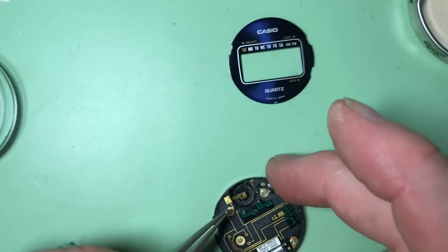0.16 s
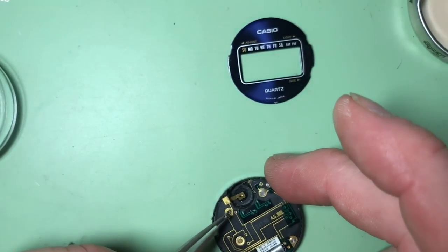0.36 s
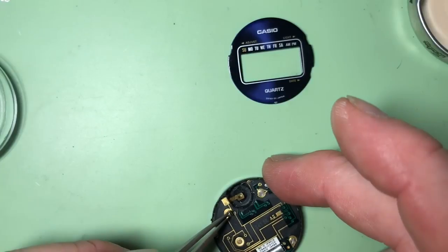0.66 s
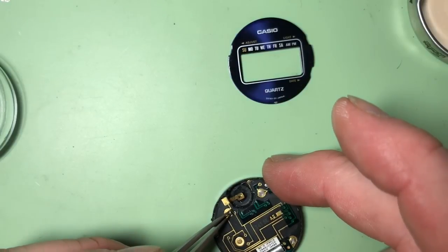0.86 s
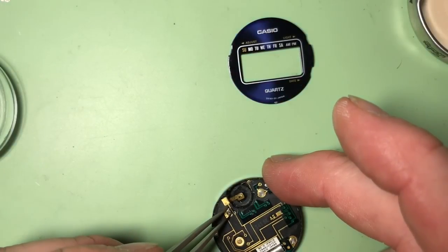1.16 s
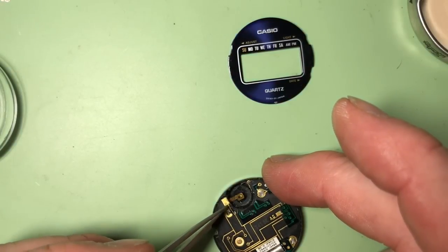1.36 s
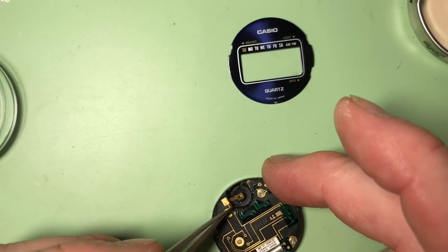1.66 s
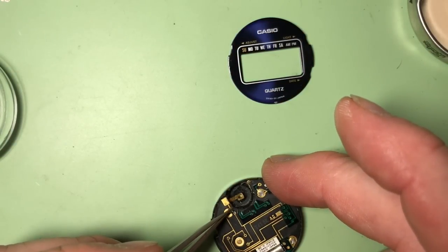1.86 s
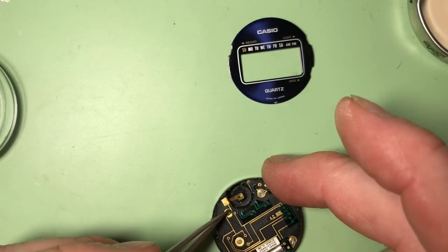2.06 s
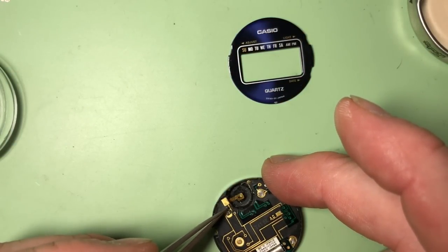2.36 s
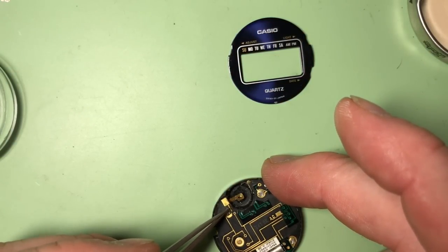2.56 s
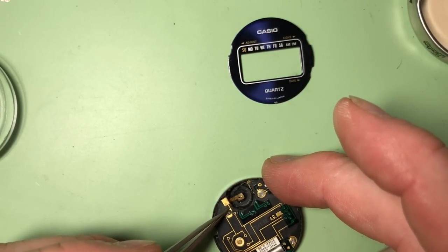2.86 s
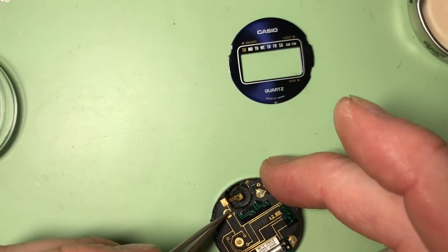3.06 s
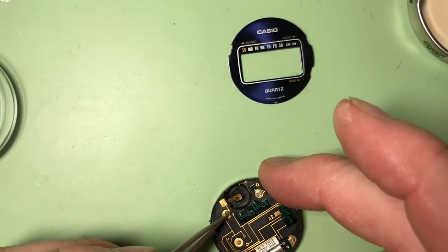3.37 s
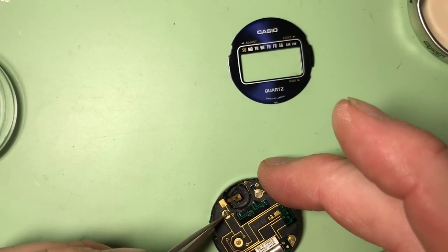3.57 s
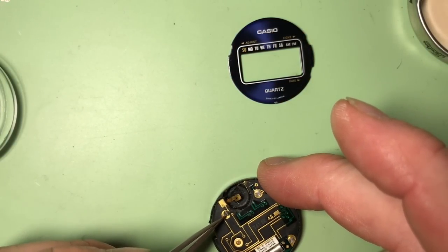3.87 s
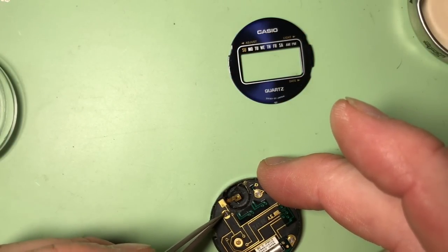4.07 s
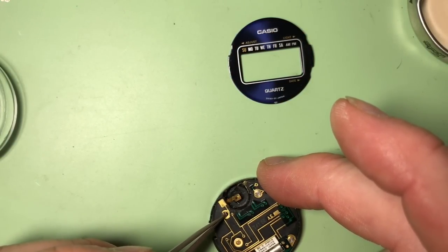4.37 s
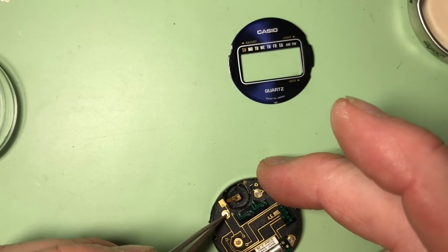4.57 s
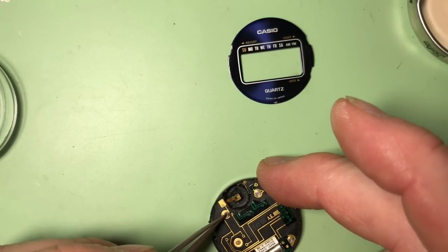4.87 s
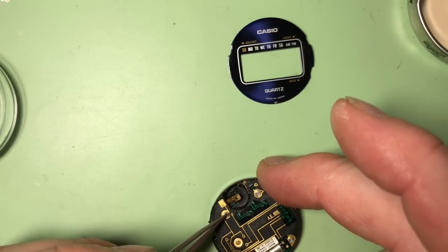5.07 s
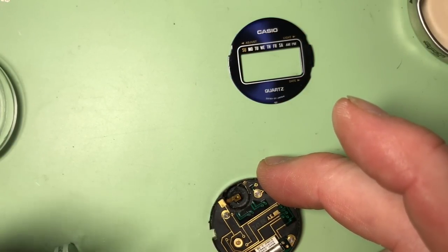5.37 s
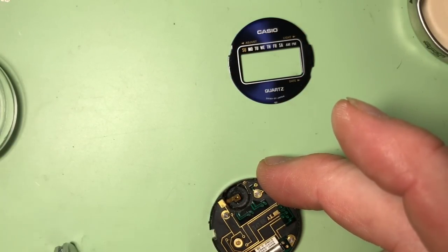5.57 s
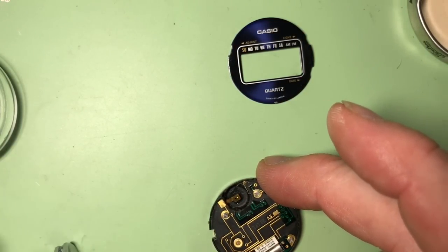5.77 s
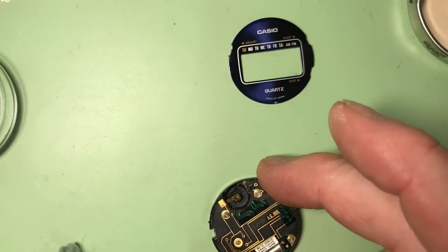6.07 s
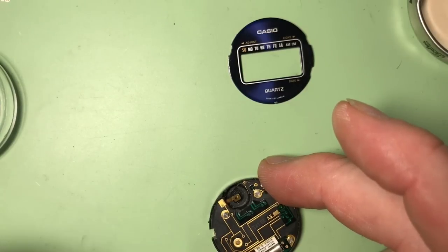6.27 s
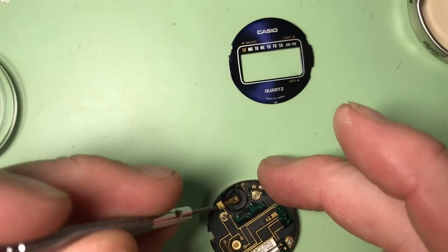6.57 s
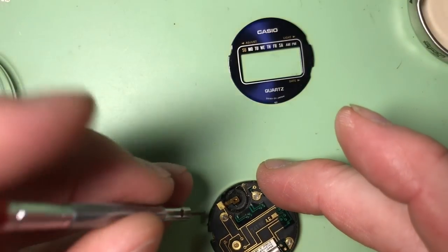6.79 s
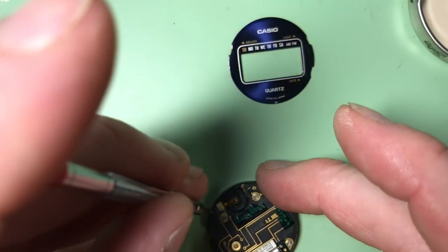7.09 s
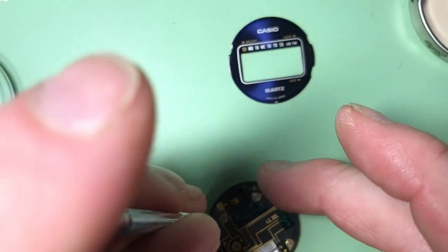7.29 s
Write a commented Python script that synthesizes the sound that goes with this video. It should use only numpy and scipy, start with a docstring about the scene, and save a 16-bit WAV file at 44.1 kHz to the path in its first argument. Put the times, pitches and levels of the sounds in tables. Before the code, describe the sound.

In a quiet small room, close to the microphone, fine steel tweezers make very faint, scattered ticks on a tiny screw and watch board. After two light taps and soft scrapes, the tweezers are dropped: a hard knock on the bench, quick shrinking bounces and a bright, brief ring. Small crisp screwdriver clicks and soft rubbing follow over faint rumble, hiss and mains hum.

```python
"""Steel tweezers tick and scrape at a tiny screw on a watch circuit board, close by in a quiet room.
They are drawn away and dropped: the bench knocks, the blades clap, ring and bounce to rest; then a
small screwdriver clicks as it is picked up. Faint rumble, hiss and mains hum lie beneath.
Contacts are decaying noise plus damped sine modes, strokes are shaped noise, bounces a shrinking series."""
import sys
import numpy as np
from scipy import signal
from scipy.fft import rfft, irfft
from scipy.io import wavfile
from scipy.ndimage import map_coordinates

SR = 44100
rng = np.random.default_rng(int(sys.argv[2]) if len(sys.argv) > 2 else 0)


def transcribe(u):
    """Save the signal u as a 16-bit wav file named by the first command-line argument.

    u: samples, shape (n,) or (channels, n), limited to [-1, 1]; the rate is SR.
    q: integer samples, one column per channel.
    """
    v = np.clip(np.atleast_2d(u).T, -1, 1)
    q = np.round(v * 32767).astype(np.int16)
    wavfile.write(sys.argv[1], SR, q)


N = 327920

# Table levels are relative: trims and spectra in the functions add to them.
# Single blows on the bench: t/s, crack/dB, knock/dB, thud/dB, steel pitch at the contact/Hz
BENCH_BLOWS = [(4.335, -51, -48, -59, 4355), (4.3656, -53.5, -54, -55.5, 4500),
               (4.746, -53.5, -57, -76, 4300), (5.3834, -41, -52, -50.5, 5940),
               (5.434, -44, -52, -46.5, 3200), (5.951, -22.5, -39.5, -31.5, 4960),
               (5.9623, -36, -54, -49.5, 5400), (6.0182, -32, -50.5, -59.5, 5250),
               (6.0254, -21, -23.5, -22.5, 2940), (6.045, -28, -29.5, -36.5, 3000)]
# Dropped tweezers bouncing on heel and each leg: first contact t/s, crack/dB, knock/dB, thud/dB,
# pitch f/Hz, first flight/s, flight ratio to the one before, loss per bounce/dB
BOUNCE_SERIES = [(6.0203, -13.5, -9.8, -22.5, 2850, .0907, .325, 6.7),
                 (6.0822, -23, -30, -39, 5100, .0348, .748, 3.3),
                 (6.099, -24.5, -34, -39, 5300, .0277, .79, 4.5)]
# Bench top flexing as a whole: f/Hz, level/dB, t60/s
THUD_MODES = [(185.4, -4, 0.17), (206, -4.5, 0.063), (235.3, -7.5, 0.12), (268, -1.5, 0.077),
              (323.7, -4.5, 0.065), (368, -5.5, 0.05), (429, -7.5, .04), (558, -19.5, 0.16)]
# Stiffer local knock of the bench top: f/Hz, level/dB, t60/s
KNOCK_MODES = [(746, -18, .07), (945, -13, .05), (1100, -12, .04), (1160, -15, .035), (1333, -13, .04),
               (1462, -2, .034), (1560, -8, .025), (1740, -5, .03), (1860, -6, .03), (2230, -9, .018),
               (2520, -16, .02), (3120, -13, .018)]
# Steel on the bench, spectrum: f/Hz, level/dB
CRACK_SPECTRUM = [(60, -40), (300, -14), (1500, -3), (2300, -3), (3300, -4), (4100, -11), (5300, 0),
                  (7700, -7), (12000, -9), (16000, -16)]
# Tweezer blades clapping together: t/s, strength/dB, brightness/(dB/octave)
BLADE_CLAPS = [(6.0405, -27, 0.5), (6.070, -32, -8.5), (6.075, -31, 2.5), (6.098, -46, 6)]
# Free steel blades: f/Hz, level/dB, t60/s
BLADE_MODES = [(2692, -13, .3), (2826, -8, .27), (3133, -13, .3), (3634, -16, .25), (5319, -5, .22),
               (6008, -10, .22), (8689, -15, .2), (9476, 2, .18), (9513, -9, .22), (11140, -11, .22),
               (11330, -11, .25), (12010, -7, .19), (14020, -11, .14), (14790, -3, .17), (15090, -10, .13)]
# Steel on steel, spectrum: f/Hz, level/dB
CLASH_SPECTRUM = [(200, -50.5), (1500, -16.5), (3000, -12), (6000, -9), (8000, -7.5), (11500, -6.5),
                  (14500, -5.5), (16000, -4)]
# Tweezer tips slipping on screw and board: t/s, level/dB, pitch of the touched part f/Hz
TIP_TICKS = [(0.1145, -37.5, 8660), (0.123, -43, 8560), (0.1378, -42, 6560), (0.896, -47, 5500),
             (0.9348, -53, 4910), (1.0633, -49, 6380), (2.0375, -46.5, 9250), (2.0512, -48.5, 5400),
             (2.8603, -48.5, 5458), (3.0906, -42.5, 9600), (3.1351, -52, 4300), (3.315, -46.5, 5670),
             (3.3472, -49, 5400), (3.3707, -49.5, 4270), (3.5348, -49.5, 5620), (4.3987, -48.5, 5290),
             (4.5027, -50.5, 4340), (5.225, -54, 9300)]
# Tips on tiny parts, spectrum: f/Hz, level/dB
PING_SPECTRUM = [(400, -56), (2500, -13), (3600, -55), (4400, 3.5), (6000, 2), (9500, -3), (12000, -6),
                 (16000, -3)]
# Held tweezers setting a small part down: t/s, strength/dB, brightness/(dB/octave)
PART_TAPS = [(5.5583, -31, 1.5), (5.789, -34, -1.5)]
# Finger-damped steel: f/Hz, level/dB, t60/s
HELD_MODES = [(3410, -4.5, 0.019), (5210, -9, 0.021), (7120, -2, 0.022), (9740, -18, 0.011),
              (12780, -2.5, 0.012), (12850, 1, 0.012)]
# Steel drawn over the bench and through the fingers: t/s, length/s, fine hiss/dB, coarse scrape/dB
STROKE_EVENTS = [(0.101, .06, -74, -63), (0.111, 0.18, -77, -68.5), (5.365, 0.13, -60, -63.5),
                 (5.535, 0.046, -61, -63.5), (5.6, 0.11, -57.5, -88), (5.662, 0.024, -66, -62.5),
                 (5.717, 0.11, -62, -78), (6.165, 0.095, -66, -61), (6.291, 0.35, -65.5, -69.5),
                 (6.721, 0.25, -67.5, -70.5)]
# Polished steel sliding, spectrum: f/Hz, level/dB
FINE_SPECTRUM = [(500, -28), (3000, -2), (6000, -4.5), (7300, -2.5), (8200, -3), (11000, -2), (12800, 2),
                 (13700, 1), (16000, 2.5)]
# Dragging on the bench, spectrum: f/Hz, level/dB
COARSE_SPECTRUM = [(60, -35), (400, -1), (950, 3.5), (1700, -4.5), (2900, 1), (3600, -4), (4400, -3),
                   (6300, -7), (9000, -2), (16000, -35)]
# Screwdriver picked up and turned: t/s, strength/dB, brightness/(dB/octave)
SCREWDRIVER_CLICKS = [(6.1785, -38, 19), (6.2235, -31.5, 11), (6.249, -37.5, 6), (6.3147, -46, -4),
                      (6.394, -43, -6.5), (6.4612, -37, -0.5), (6.5137, -28, 2.5), (6.540, -33.5, 3),
                      (6.6904, -30, 9.5), (6.953, -28.5, -0.5)]
# Screwdriver steel: f/Hz, level/dB, t60/s
SHAFT_MODES = [(2790, -12.5, 0.01), (6330, -3, 0.0092), (10120, -3.5, 0.013675), (14300, -15, 0.013),
               (15600, 2, 0.012)]
# Room decay: f/Hz, t60/s
ROOM_DECAY = [(150, .35), (1000, .25), (5000, .22), (15000, .12)]
# Room rumble, spectrum: f/Hz, level/dB
RUMBLE_SPECTRUM = [(15, -45), (25, -22), (42, -9), (55, -3), (78, -11), (120, -12), (150, -9), (220, -11),
                   (330, -11), (480, -19), (1000, -21), (1250, -24), (1700, -55)]
# Microphone hiss, spectrum: f/Hz, level/dB
HISS_SPECTRUM = [(710, -31), (1200, -24), (1290, -1.5), (1570, -0.5), (1720, -3), (3700, -5), (4910, -8),
                 (5970, -8), (9720, -10.5), (10600, -15), (11800, -6), (15200, -8.5), (16000, -11.5)]

T_S = np.arange(SR // 2) / SR  # time axis of one contact
FIRM_DB = -30  # strength of a firm contact
RING_DB_PER_DB = 2  # ring per dB of strength: light touches mostly clash
KNOCK_LOSS_RATIO = 1.85  # knock loses this many times the dB of crack and thud
SOFT_TILT = 0.22  # light knocks are duller: dB/octave lost per dB below firm
MODE_SPREAD = .025  # largest relative detuning of a knock mode, redrawn each landing
UNEVEN_HZ, UNEVEN_DB = 41.7, 6  # finger pressure: random points per second, spread
SNAG_RATE_HZ, SNAG_DB, SNAG_T60_S = 110, 4.5, 0.0085  # mean rate, level over the rub, decay


def amp(db):
    """Decibels to gain."""
    return 10 ** (np.asarray(db) / 20)


def unit(x):
    """Scale to rms 1."""
    return x / np.sqrt(np.mean(x ** 2) + 1e-20)


def along(points, hz):
    """Interpolate (f/Hz, value) points on a log frequency axis."""
    f, v = np.transpose(points)
    return np.interp(np.log(hz + 1), np.log(f + 1), v)


def add(track, start_s, sound):
    """Mix a sound into the track, cut at its end."""
    part = track[round(start_s * SR):][:len(sound)]
    part += sound[:len(part)]


def noise(spectrum, size, tilt=0):
    """Noise of rms 1 with a spectrum, tilted in dB/octave above 1 kHz."""
    hz = np.fft.rfftfreq(size, 1 / SR)
    octaves = np.log2(np.maximum(hz, 1000) / 1000)
    gain = amp(along(spectrum, hz) + tilt * octaves)
    return unit(irfft(rfft(rng.standard_normal(size)) * gain, size))


def fade(t60_s):
    """Exponential decay, 60 dB down after t60."""
    return np.exp(-np.log(1000) * T_S / max(t60_s, 1e-4))


def ring(modes, attack_s, tilt=0):
    """Damped modes; each blow lands elsewhere and excites them at new strengths."""
    middle_hz = np.mean([mode[0] for mode in modes])
    scatter_db = 2 * rng.uniform(-1, 1, len(modes))
    total = np.zeros(len(T_S))
    for luck_db, (hz, db, t60_s) in zip(scatter_db, modes):
        gain = amp(db + luck_db + tilt * np.log2(hz / middle_hz))
        total += gain * fade(t60_s) * np.sin(2 * np.pi * hz * T_S)
    return total * (1 - np.exp(-T_S / attack_s))


def burst(spectrum, t60_s, tail_db, tail_t60_s, tilt=0):
    """Contact noise: a sharp crack over the wash of many weak modes."""
    envelope = fade(t60_s) + amp(tail_db) * fade(tail_t60_s)
    return noise(spectrum, len(T_S), tilt) * envelope / 2


def bounces(count):
    """Each flight is shorter by a fixed ratio, each landing lighter by a fixed loss."""
    landings = []
    for s, crack_db, knock_db, thud_db, hz, flight_s, ratio, loss_db in BOUNCE_SERIES:
        for k in range(count):
            lost_db = k * loss_db
            knock_lost_db = KNOCK_LOSS_RATIO * lost_db
            landings.append((s, crack_db - lost_db, knock_db - knock_lost_db, thud_db - lost_db, hz))
            s += flight_s * ratio ** k
    return landings


def bench():
    """Steel strikes the bench: contact crack and ping, local knock modes, whole-top thud modes."""
    out = np.zeros(N)
    for s, crack_db, knock_db, thud_db, hz in BENCH_BLOWS + bounces(count=5):
        # close pair, one for each leg
        ping = ring([(hz, -4, .01), (hz * 1.12, -7, .009)], attack_s=.0002)
        crack = amp(0.5) * burst(CRACK_SPECTRUM, t60_s=0.0043, tail_db=-23, tail_t60_s=0.12)
        add(out, s, amp(crack_db) * (crack + ping))

        # modes lie in close clusters; each landing picks its own share
        modes = [(f * (1 + MODE_SPREAD * rng.uniform(-1, 1)), db, t60_s) for f, db, t60_s in KNOCK_MODES]
        tilt = SOFT_TILT * min(knock_db - FIRM_DB, 0)
        add(out, s, amp(knock_db - 1.5) * ring(modes, attack_s=0.0017, tilt=tilt))
        add(out, s, amp(thud_db - 1.5) * ring(THUD_MODES, attack_s=0.0012))
    lowest_hz = 150  # small bench top radiates little below its first mode
    return signal.sosfilt(signal.butter(3, lowest_hz, "high", fs=SR, output="sos"), out)


def contacts(touches, ring_db):
    """Firmer touches ring more: rows of t/s, ring/dB, clash/dB, brightness/(dB/octave)."""
    return [(s, FIRM_DB + ring_db + RING_DB_PER_DB * (db - FIRM_DB), db, tilt) for s, db, tilt in touches]


def steel(hits, modes, clash_t60_s, wash_db, wash_t60_s, attack_s):
    """Steel meets steel: a bright noise clash plus the tool's damped modes."""
    out = np.zeros(N)
    for s, ring_db, clash_db, tilt in hits:
        # the clash takes half the brightness tilt
        clash = amp(clash_db) * burst(CLASH_SPECTRUM, clash_t60_s, wash_db, wash_t60_s, tilt / 2)
        add(out, s, clash + amp(ring_db - 8.0) * ring(modes, attack_s, tilt))
    return out


def blades(lands_s=6.111, choke_db_per_s=220):
    """Blades ring freely in mid-bounce and are choked once they lie on the bench."""
    free = steel(contacts(BLADE_CLAPS, ring_db=-1.5), BLADE_MODES, clash_t60_s=0.01103,
                 wash_db=-11.0, wash_t60_s=0.17, attack_s=0.0023)
    lying_s = np.maximum(np.arange(N) / SR - lands_s, 0)
    return free * amp(-choke_db_per_s * lying_s)


def tips():
    """Tips slip off tiny parts: a short damped ping and contact noise with no bass."""
    out = np.zeros(N)
    for s, db, hz in TIP_TICKS:
        ping = ring([(hz, -10, 0.019)], attack_s=0.000067)
        contact = burst(PING_SPECTRUM, t60_s=0.0052, tail_db=-16.0, tail_t60_s=0.048)
        add(out, s, amp(db) * (ping + contact))
    return out


def taps():
    """Held tweezers set a part down: a clash and finger-damped modes."""
    return steel(contacts(PART_TAPS, ring_db=1), HELD_MODES, clash_t60_s=0.0068,
                 wash_db=-18, wash_t60_s=0.046, attack_s=0.00049)


def wander(rate_hz, size):
    """Random values at a given rate, joined by straight lines."""
    return map_coordinates(rng.standard_normal(SR), [np.arange(size) * rate_hz / SR], order=1)


def friction(grain_hz, grain_db, ring_db):
    """Each stroke swells and dies; catches and snags make it grainy and stir the held steel."""
    out = np.zeros(N)
    for s, length_s, fine_db, coarse_db in STROKE_EVENTS:
        size = max(round(length_s * SR), 64)
        catches = wander(grain_hz, size)
        pressure = wander(UNEVEN_HZ, size)
        snag_starts = 1.0 * (rng.random(SR) < SNAG_RATE_HZ / SR)
        snags = signal.fftconvolve(snag_starts, fade(SNAG_T60_S))[:size]
        grip = unit(amp(grain_db * catches + UNEVEN_DB * pressure) * (1 + amp(SNAG_DB) * snags))
        rub = amp(fine_db) * noise(FINE_SPECTRUM, size) + amp(coarse_db) * noise(COARSE_SPECTRUM, size)
        swell = np.sin(np.linspace(0, np.pi, size))
        add(out, s, rub * grip * swell)
    tool = ring(HELD_MODES, attack_s=0.00034)
    return out + amp(ring_db) * signal.fftconvolve(out, tool / np.linalg.norm(tool))[:N]


def doubled(touches, gap_s, drop_db):
    """A loosely held tool touches twice: it catches, then seats a moment later."""
    return touches + [(s + gap_s, db - drop_db, tilt) for s, db, tilt in touches]


def screwdriver():
    """Handling clicks: doubled clashes with short-lived shaft modes."""
    clicks = contacts(doubled(SCREWDRIVER_CLICKS, gap_s=0.0054, drop_db=8.5), ring_db=0)
    return steel(clicks, SHAFT_MODES, clash_t60_s=0.013, wash_db=-19.5, wash_t60_s=0.047, attack_s=0.00038)


def room(x):
    """A small room answers 5 ms late with decaying noise, its treble dying first."""
    hz, t_s, z = signal.stft(rng.standard_normal(SR // 2), SR, nperseg=256)
    decay = np.exp(-np.log(1000) * t_s / along(ROOM_DECAY, hz)[:, None])
    tail = signal.istft(z * decay, SR, nperseg=256)[1]
    delayed = np.pad(x, (SR // 200, 0))
    return signal.fftconvolve(delayed, tail / np.linalg.norm(tail))[:N]


def background():
    """Steady noise for room rumble and microphone hiss, a sine for mains hum."""
    hum_hz, hum_db, rumble_db, hiss_db = 100, -67.5, -68, -73.5
    hum = amp(hum_db) * np.sin(2 * np.pi * hum_hz * np.arange(N) / SR)
    rumble = amp(rumble_db) * noise(RUMBLE_SPECTRUM, N)
    hiss = amp(hiss_db) * noise(HISS_SPECTRUM, N)
    return rumble + hiss + hum


def scene():
    """Tools close to the microphone; bench knocks stir the room more than the tools do."""
    rubs = friction(grain_hz=1180, grain_db=3.0, ring_db=-12)
    tools = tips() + blades() + taps() + screwdriver() + rubs
    knocks = bench()
    tools_wet_db, knocks_wet_db = -26, -21
    reverb = room(amp(tools_wet_db) * tools + amp(knocks_wet_db) * knocks)
    return (tools + knocks + reverb + background())[None]


def record(dry):
    """The recorder's band limit: a steep sine-squared roll-off."""
    middle_hz, width_hz = 16100, 600
    hz = np.fft.rfftfreq(N, 1 / SR)
    passed = np.clip((middle_hz - hz) / width_hz + .5, 0, 1)
    return irfft(rfft(dry) * np.sin(passed * np.pi / 2) ** 2, N)


dry = scene()
out = record(dry)
transcribe(out)
```